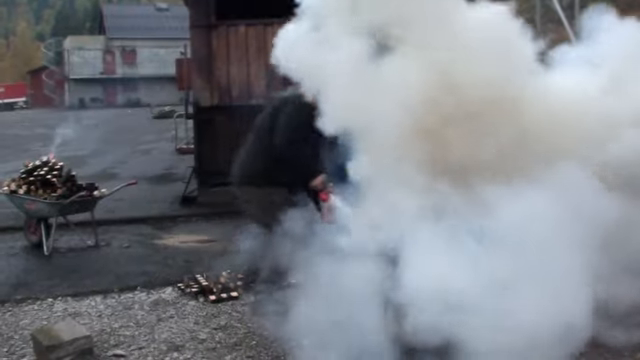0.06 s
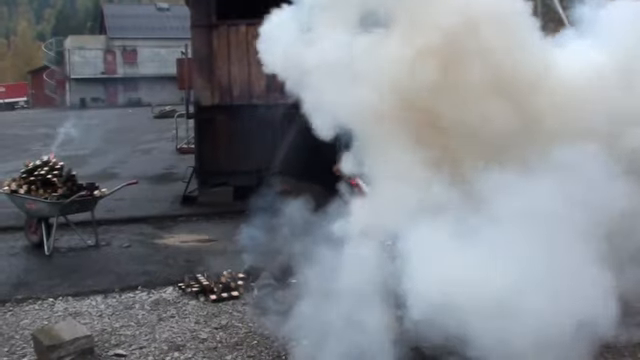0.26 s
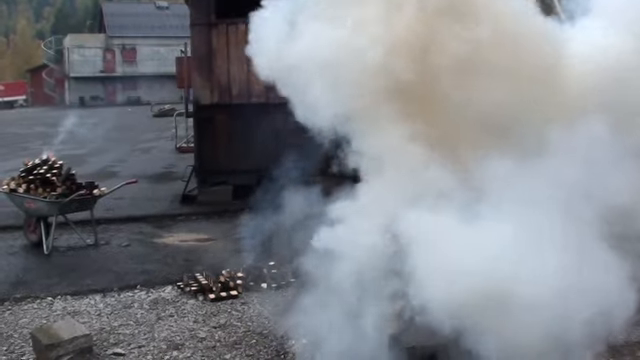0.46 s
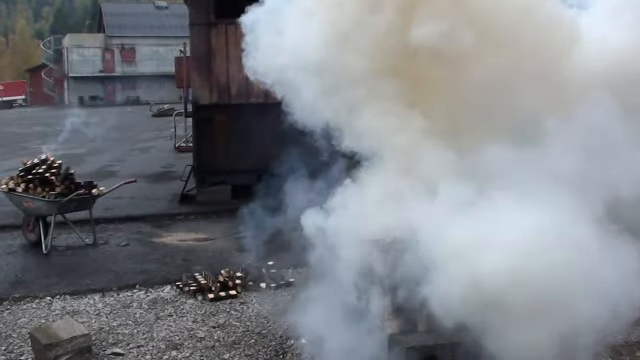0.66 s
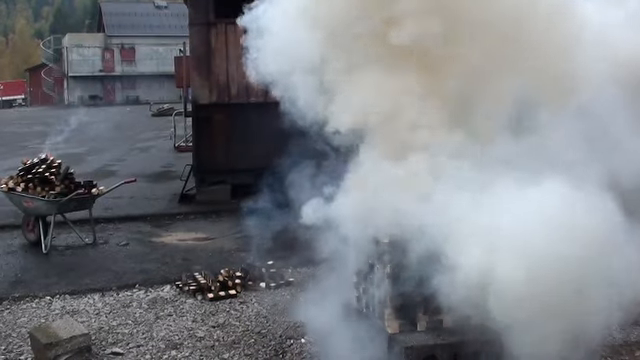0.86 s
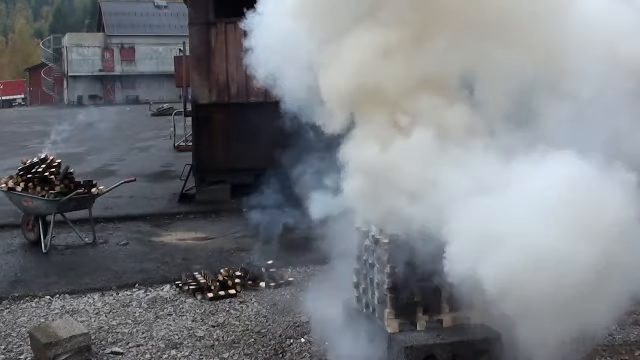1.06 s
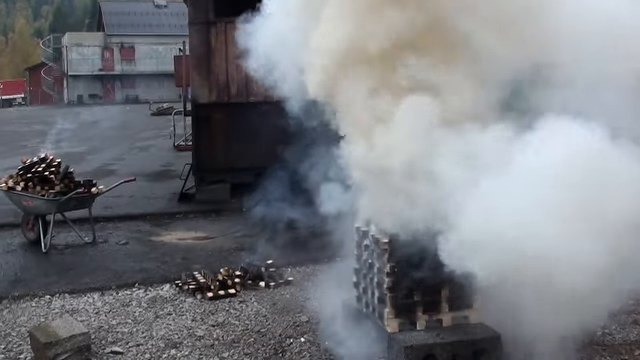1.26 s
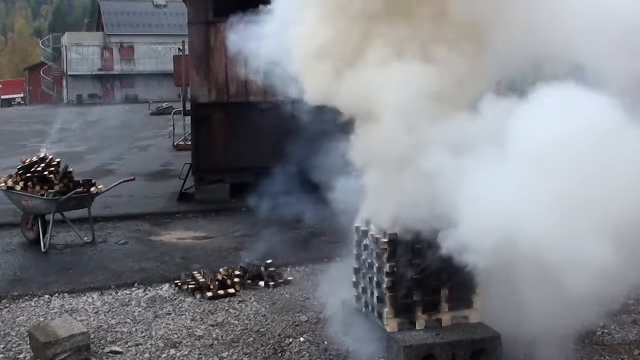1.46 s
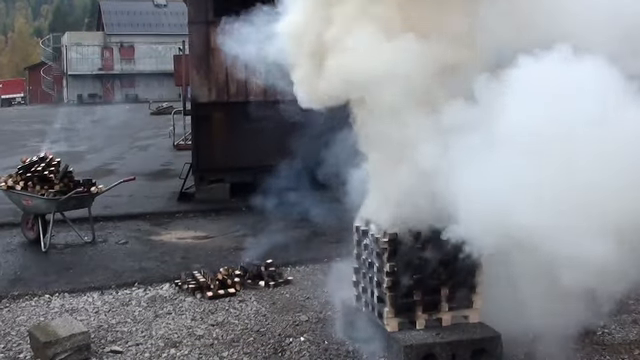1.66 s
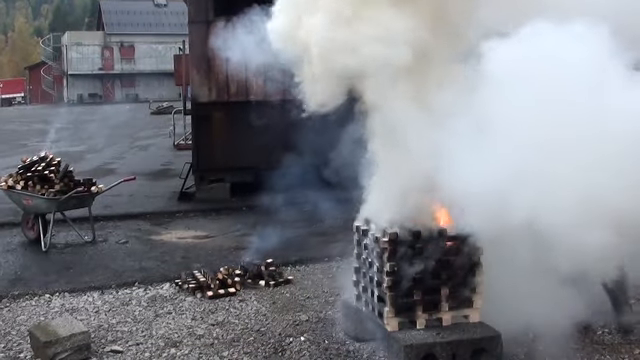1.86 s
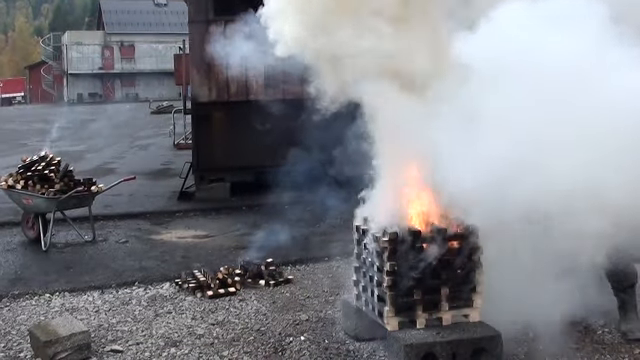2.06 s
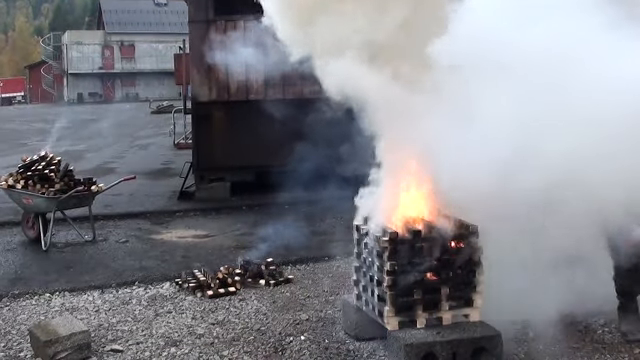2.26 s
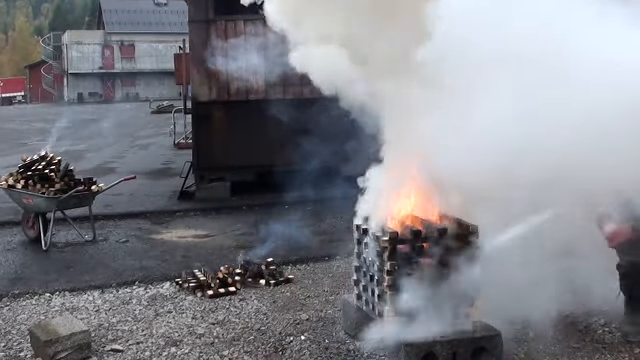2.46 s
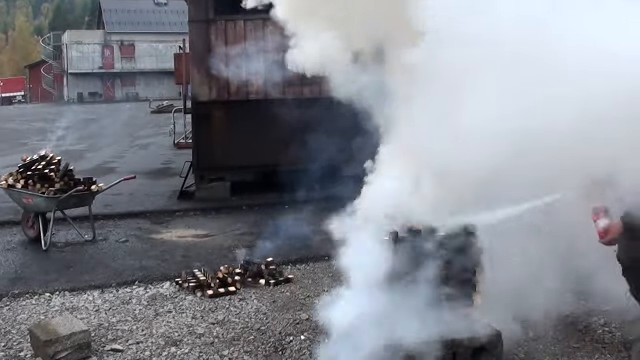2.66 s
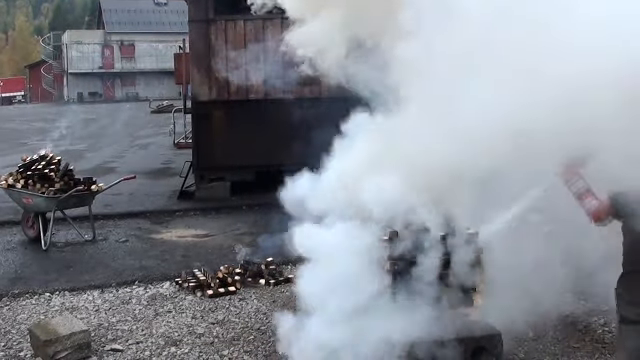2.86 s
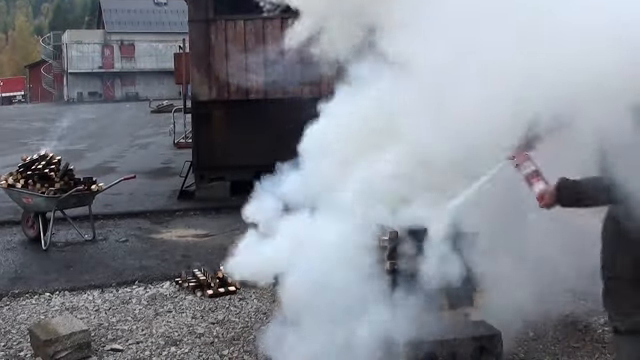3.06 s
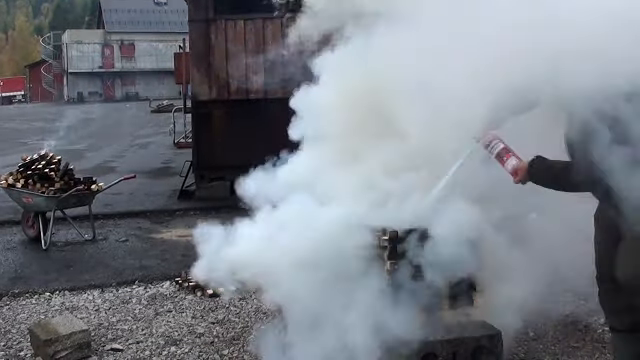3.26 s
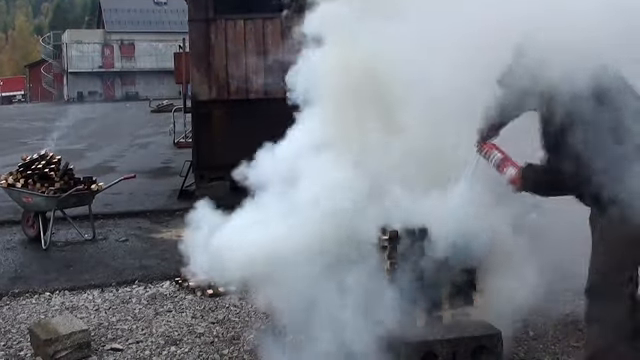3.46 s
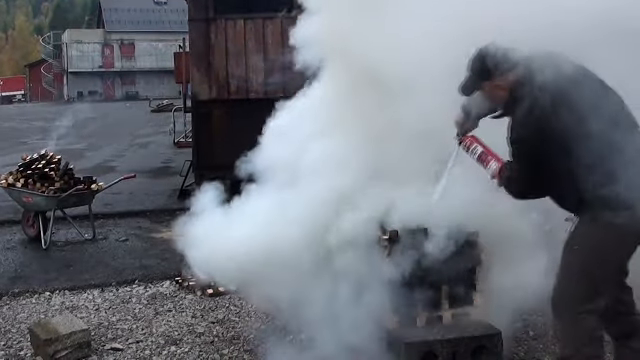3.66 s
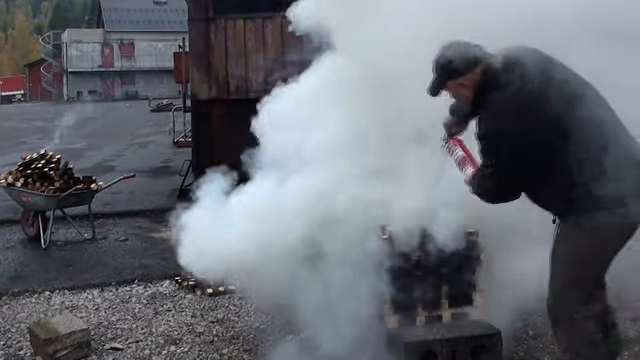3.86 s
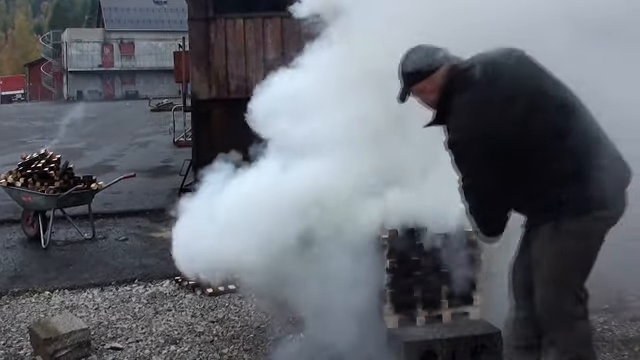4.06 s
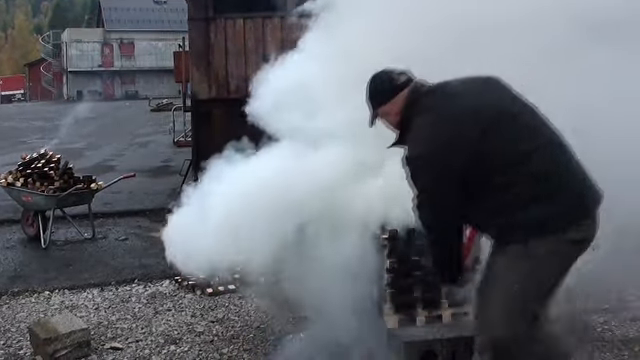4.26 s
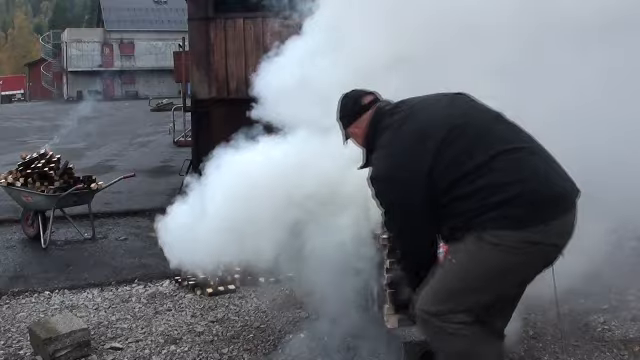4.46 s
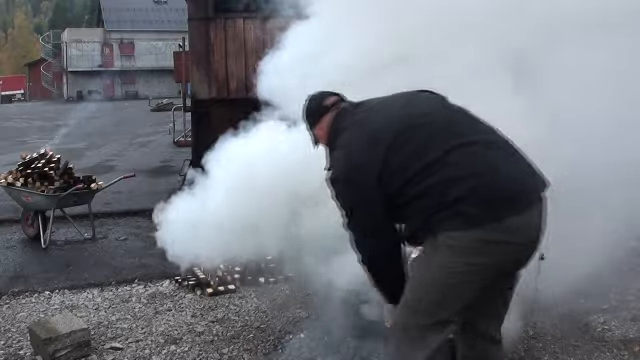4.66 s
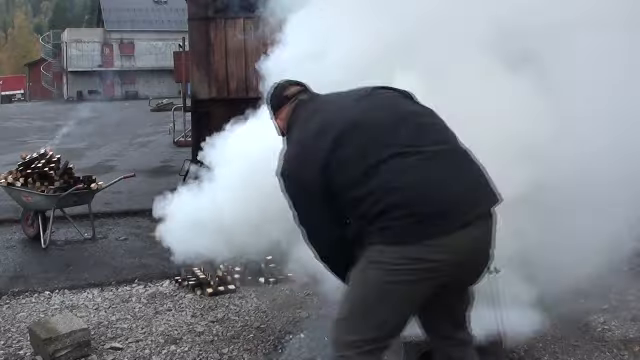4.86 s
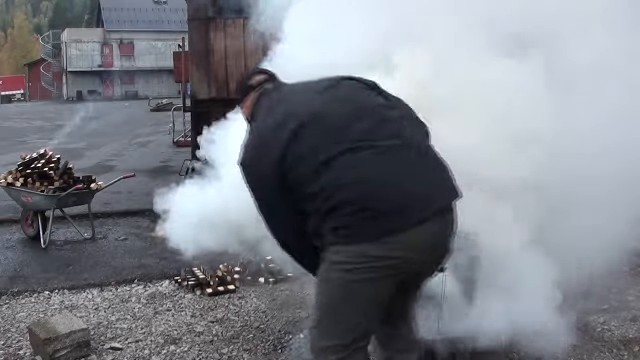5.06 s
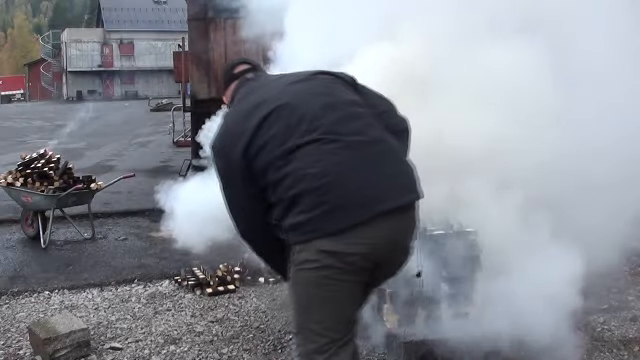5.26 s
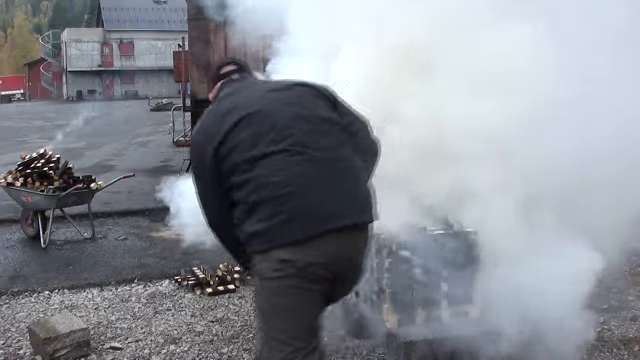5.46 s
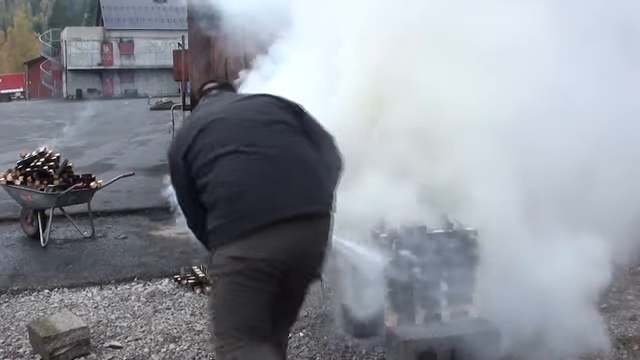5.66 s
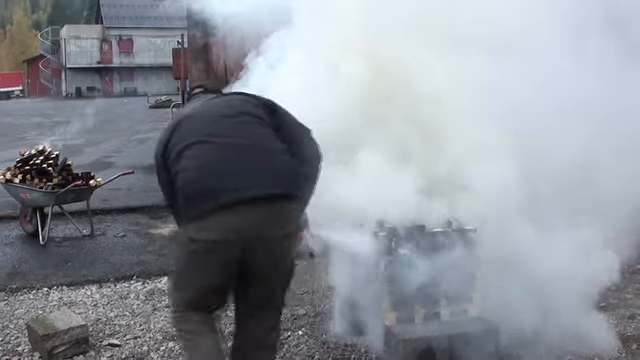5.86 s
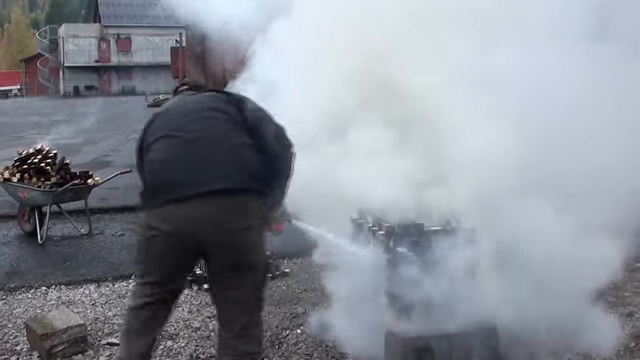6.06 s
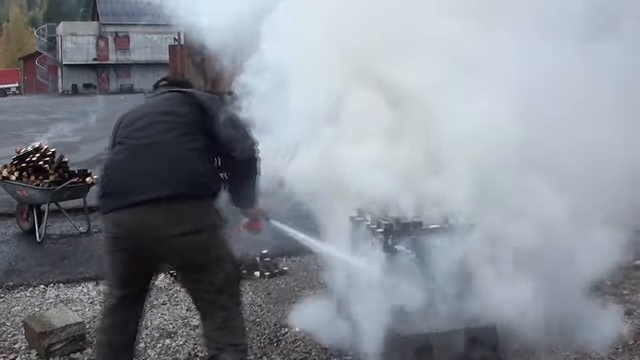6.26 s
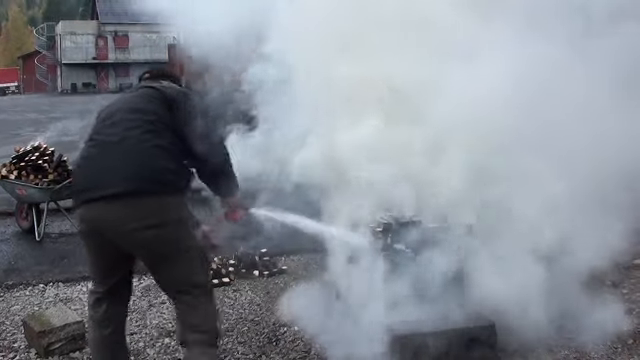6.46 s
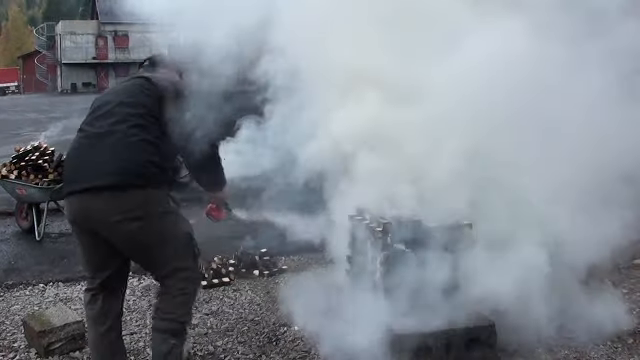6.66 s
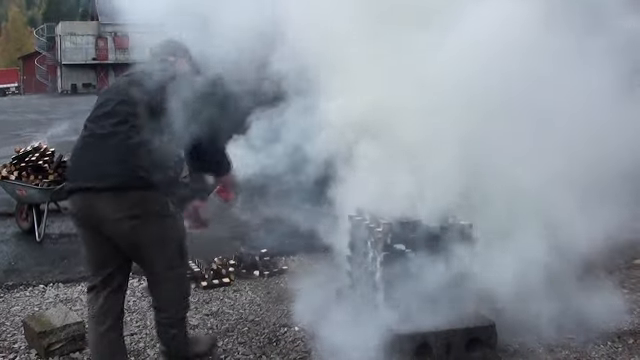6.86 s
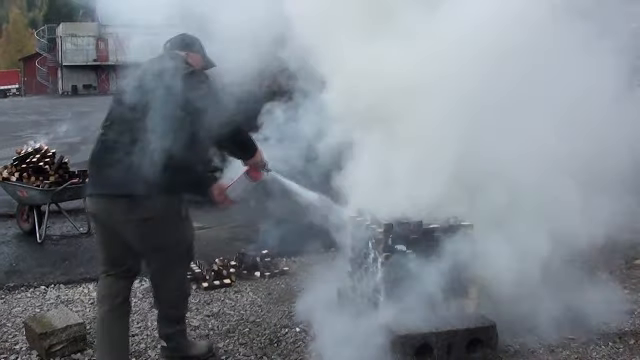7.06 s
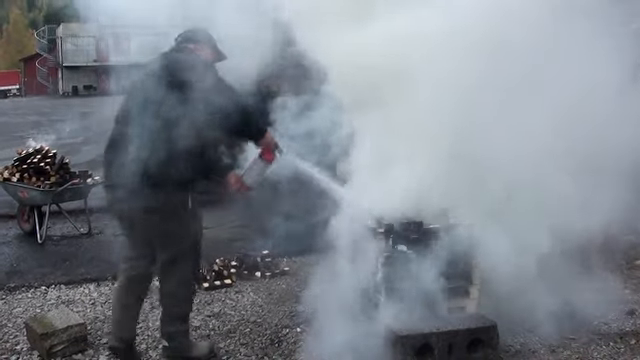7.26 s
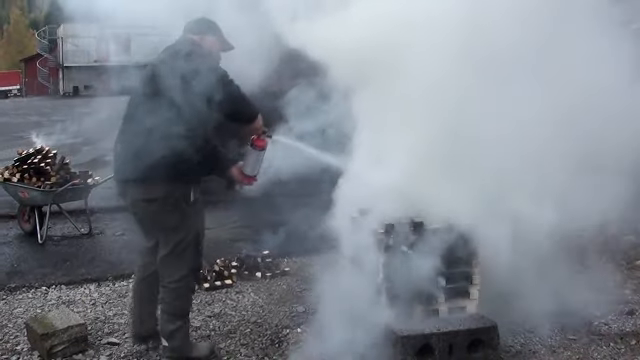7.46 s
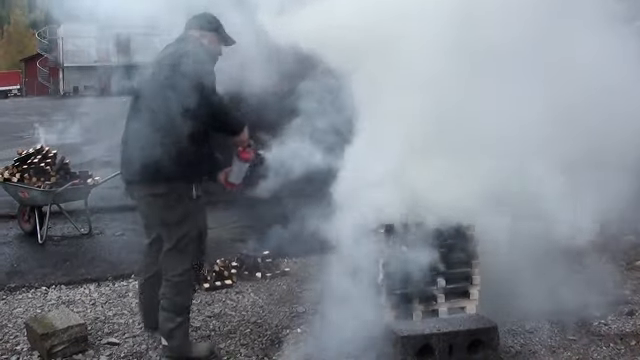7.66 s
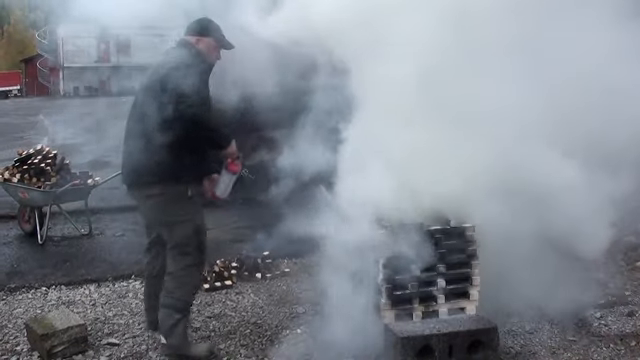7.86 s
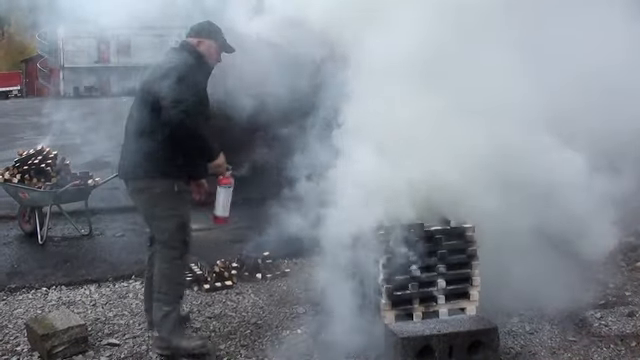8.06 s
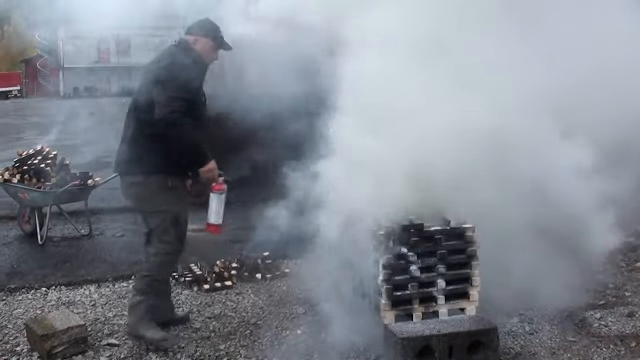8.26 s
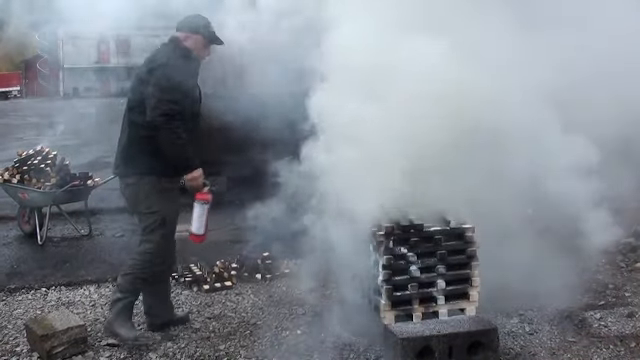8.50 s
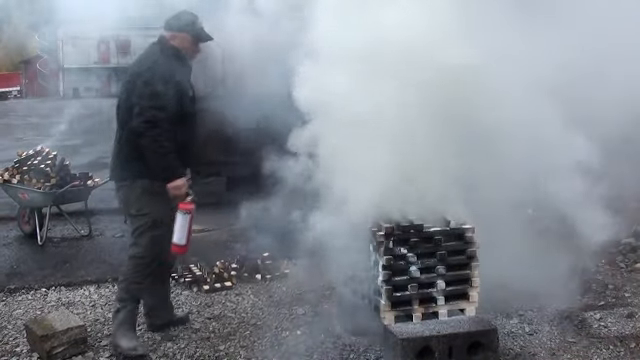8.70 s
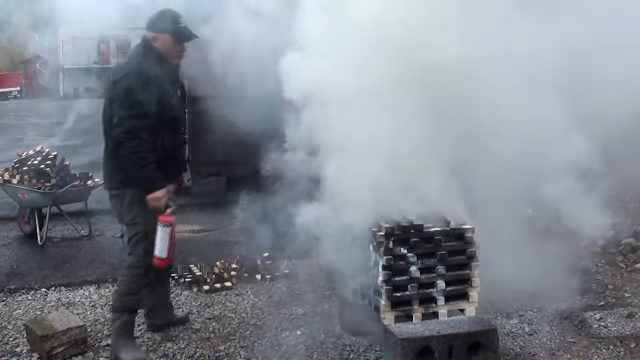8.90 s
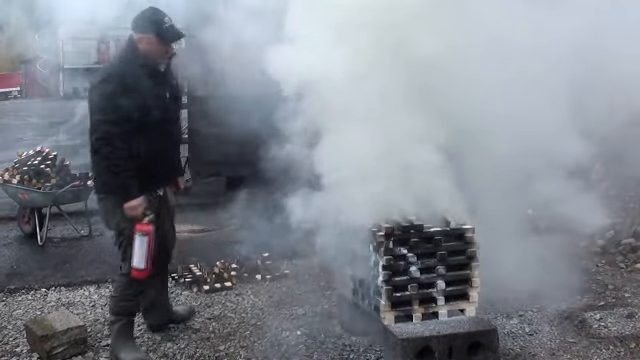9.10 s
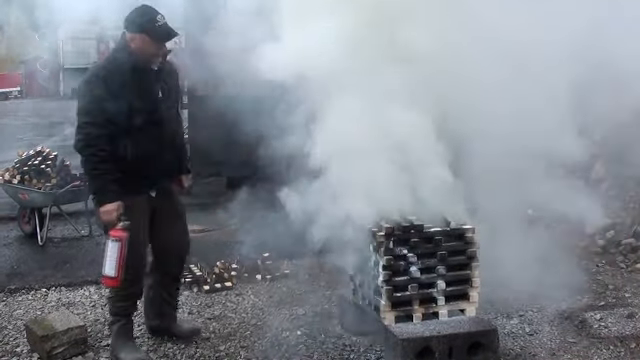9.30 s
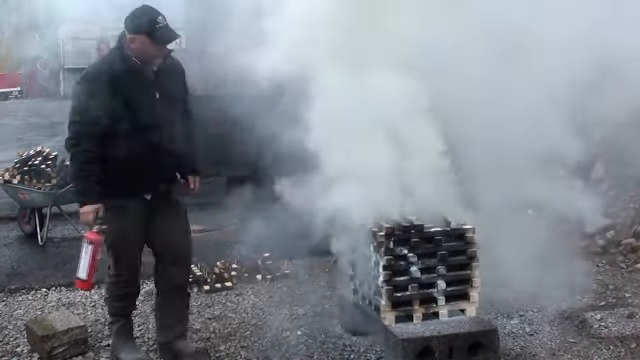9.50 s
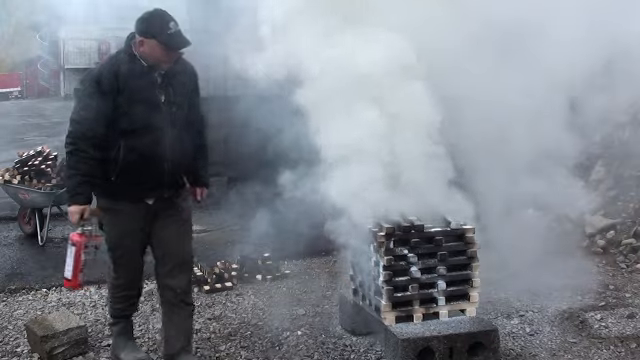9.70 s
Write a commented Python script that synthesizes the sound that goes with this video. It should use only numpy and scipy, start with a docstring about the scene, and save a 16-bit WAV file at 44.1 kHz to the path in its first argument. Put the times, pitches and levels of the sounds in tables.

```python
"""A hand extinguisher sprays five bursts at a burning stack of wood in a gravel yard.
Its jet hisses, spits with each slug (small lump) of liquid and bounces off the ground and the logs.
Steam pockets pop in the wood, and a shed wall slaps each pop back. Wet embers sizzle, boots crunch
on the gravel and a metal part clinks. A far engine hums over a low rumble."""
import sys
import numpy as np
from scipy import signal
from scipy.fft import rfft, irfft, next_fast_len
from scipy.io import wavfile
from scipy.ndimage import uniform_filter1d, map_coordinates

SR = 44100
rng = np.random.default_rng(int(sys.argv[2]) if len(sys.argv) > 2 else 0)


def dump(signal):
    """Clip the signal to [-1, 1] and save it as 16-bit WAV at the path in sys.argv[1]."""
    limited = np.clip(np.atleast_2d(signal).T, -1, 1)
    pcm = np.round(limited * 32767).astype(np.int16)
    wavfile.write(sys.argv[1], SR, pcm)


N = 429093
TIME_S = np.arange(N) / SR
WALL_ECHO_S = .0299

# The valve, one row a burst: opens_s, opening_length_s, shuts_s, closing_length_s
VALVE = [(.035, .007, .53, .042), (2.555, .015, 4.272, .065), (4.595, .02, 5.36, .08),
         (5.765, .045, 6.68, .075), (7.258, .04, 7.545, .07)]
# Tone colour of embers and gravel: pitch_hz, level_db
EMBER_GRAVEL_COLOUR = [(120, -42), (200, -2), (264, -12), (289, -7), (403, -7), (552, -7), (1270, -10.5),
                       (2090, -3.5), (4880, -5.5), (7740, -2.5), (15000, -19), (16500, -34)]
# Short crunches: boots on gravel, and the crunchy tail of the wood pop near 8.82 s:
# middle_s, length_s, grit_db, crunch_db, scuff_db, thud_hz, thud_db
CRUNCHES = [(0.606, 0.073, -71, -61, -52, 480, -57), (1.617, 0.1, -43, -43, -40, 404, -40),
            (1.91, 0.11, -52, -53, -63, 397, -53), (2.113, 0.25, -39, -40, -44, 390, -45),
            (2.276, 0.29, -51, -54, -53, 400, -53), (3.757, .07, -40, -21, -33, 406, -50),
            (4.462, 0.25, -38, -44.5, -40.5, 394, -43), (4.595, 0.098, -27, -36, -45, 400, -55),
            (5.713, 0.065, -29, -19.5, -30, 396, -48), (5.75, 0.099, -33, -32, -35.5, 400, -55),
            (6.87, 0.09, -45, -48, -54, 398, -55), (7.211, 0.12, -39.5, -46, -39.5, 419, -41),
            (8.066, .18, -40, -42, -38.5, 405, -54), (8.18, 0.35, -53, -46.5, -51, 404, -59),
            (8.526, 0.087, -36, -37, -50, 402, -55), (8.835, 0.056, -52, -37, -44, 404, -55),
            (8.873, .13, -50, -52, -45, 393, -57), (9.025, 0.1, -55, -54, -52, 404, -55),
            (9.14, 0.13, -53, -57, -48, 438, -44), (9.22, .15, -45, -46, -53, 400, -55),
            (9.353, .16, -55, -57, -50, 400, -57)]
# Extra noise as a burst ends: sizzle_db, crunch_db, scuff_db
DOUSED_DB = (-37, -34, -46.5)
# How the background rises and falls: time_s, rumble_db, hum_db
BACKGROUND = [(0, -50, -66), (.55, -51, -66), (.9, -58.5, -59), (2.0, -54, -52.5), (2.35, -48.5, -46),
              (2.8, -51.5, -70), (3.7, -51.5, -50), (4.1, -41.5, -54.5), (4.45, -51, -53),
              (5.0, -41.5, -57), (5.4, -50.5, -48), (6.25, -49, -59), (6.85, -52, -50.5), (7.3, -51, -49.5),
              (8.4, -53, -51.5), (9.73, -53.5, -50)]


def jet():
    """Swirling gas hisses and roars; the valve and the moving nozzle shape each burst."""
    # Tone colour of the jet: pitch_hz, level_db
    colour = [(120, -26), (200, -11), (264, -18.5), (368, -10.5), (503, -18), (860, -9.5), (1610, -16.5),
              (2010, -13), (4620, -8), (7060, 1.5), (10400, -9), (14800, -27.5), (15600, -32), (16500, -65)]
    # One row a burst: air_db, wash_db (both against the hiss), low_roar_db, nozzle_ring_db
    # (both against the roar), left_minus_right_db
    bursts = [(-13, -21.5, 1.5, -27, 0.13), (-16.5, -21, -1, -20.5, -0.53), (-17.5, -16.5, -2, -16.5, -1.7),
              (-17.5, -22.5, -4.5, -10, 0.16), (-12.5, -18.5, -2, -18, .2)]
    # The nozzle moves: time_s, hiss_db, roar_db, tone_db (both against the hiss),
    # low_minus_high_hiss_db, ground_delay_ms, ground_strength (0-1)
    nozzle_moves = [(.05, -18.5, -8.5, -24, -5, 1.37, 0.8), (.135, -16.5, -6.5, -25, 7, 1.33, .65),
                    (.2, -19, -9.5, -36, 8, 1.23, 1), (.32, -14.5, -12, -33, -1, 1.24, 0.66),
                    (.39, -15.5, -6, -28, 8, 1.32, 0.7), (.53, -15, -15, -35, -5, 1.26, 0.2),
                    (2.56, -22.5, 3, -21, -5, 1.4, .6), (2.68, -18.5, -2.5, -25, -1, 1.44, 0.8),
                    (2.8, -17.5, -5, -27.5, 0, 1.51, 0.64), (3.25, -16, -5, -26, 3, 1.88, 0.33),
                    (3.6, -16, -8, -47, 0.5, 2.04, 0.48), (4.05, -16, -9.5, -36.5, 2, 2, .05),
                    (4.3, -15.5, -7, -48, -1, 1.9, .27), (4.6, -21.5, -2, -48, -11, 1.6, 0.09),
                    (4.75, -16, -8.5, -48, -2, 1.4, 0), (4.88, -18, -6.5, -48, -2, 1.8, 0.05),
                    (5.0, -19, -9, -48, -7, 1.43, .1), (5.15, -17.5, -9, -48, -1.5, 1.75, 0.14),
                    (5.4, -17, -7.5, -48, 1, 1.8, .13), (5.8, -20, -0.5, -15, -2, 1.78, 0.53),
                    (6.08, -14.5, -11.5, -46, 1, 1.69, 0.32), (6.3, -15.5, -7.5, -40, 3, 1.66, 0.25),
                    (6.5, -15.5, -6, -41, -7, 1.66, 0.44), (6.7, -16, -6.5, -44, -7, 1.68, 0.67),
                    (7.3, -24, 1, -22, -3, 1.8, 0.76), (7.45, -22.5, -2.5, -27, -9, 1.87, 0.5),
                    (7.53, -19.5, 0, -29, -2, 1.92, 0.4)]
    # Slugs, one row a burst: first_per_s, settled_per_s, settling_s, share_of_flow (0-1)
    sputter = [(620, 410, .08, .3), (670, 375, .11, .34), (450, 350, .3, .08), (630, 315, .13, .32),
               (510, 330, .2, .6)]
    row, open_s, shut_s = valve()
    opens, opening, shuts, closing = np.array(VALVE)[row].T
    air_db, wash_db, low_roar_db, ring_db, pan_db = np.array(bursts)[row].T
    first, settled, settling, share = np.array(sputter)[row].T
    hiss_db, roar_db, tone_db, tilt_db, ground_ms, ground_strength = curves(nozzle_moves)
    valve_db = -28 * np.clip(1 - open_s / opening, 0, 1) - 25 * shut_s / closing
    level_db = np.where(open_s > 0, hiss_db + valve_db, -200) + 3
    gush = np.exp(-np.abs(open_s) / .17)  # each burst starts heavier in the bass
    pinch = np.exp(-np.maximum(shuts - opens - open_s, 0) / .093)  # the closing valve brightens it
    # The slugs slow down as the pressure settles.
    slugs_per_s = settled + (first - settled) * np.exp(-np.abs(open_s) / settling) - 20 * open_s
    slug_count = np.cumsum(slugs_per_s) / SR
    flow = near_echoes(spitting_flow(slug_count, share), ground_ms, ground_strength)

    surge_db = wobble(14)
    lean_db = tilt_db / 2 + .27 * wobble(7)
    hiss = .51 * shape(flow, colour, 4650, 6620) * undb(surge_db + lean_db + .8 * wobble(25))
    hiss += .43 * shape(flow, colour, 7030, 10100) * undb(surge_db - lean_db + 3 * wobble(25))
    air = shape(flow, colour, lo_hz=10800) * undb(air_db + 2.5 * pinch + surge_db)
    roar = .73 * shape(flow, colour, 2540, 4720) * undb(surge_db + 2.5 * wobble(25))
    roar += .5 * shape(flow, colour, 1484, 2180) * undb(low_roar_db + surge_db + 1.5 * wobble(25))
    roar += shape(flow, colour, 2880, 3020) * undb(ring_db + 2.4 * wobble(12))  # hollow nozzle ring
    wash = shape(flow, colour, hi_hz=1300) * undb(wash_db + 6.5 * gush + 1.8 * wobble(25))
    tone = sputter_tone(slug_count, gush) * undb(tone_db + 3 * wobble(10))
    # Only hiss and roar are placed left or right; they drift left as a burst dies.
    pan_db = pan_db + 5 * np.minimum(shut_s / closing, 1)
    panned = (hiss + roar * undb(roar_db)) * undb(np.array([pan_db, -pan_db]) / 2)
    return (panned + air + wash + tone) * undb(level_db)


def valve():
    """For each moment: which burst it is, seconds since the valve opened, seconds since it shut."""
    opens, _, shuts, _ = np.transpose(VALVE)
    row = np.maximum(np.searchsorted(opens, TIME_S) - 1, 0)
    return row, TIME_S - opens[row], np.maximum(TIME_S - shuts[row], 0)


def spitting_flow(slug_count, share):
    """Rushing gas, in which each slug of liquid makes a pressure kick and a short puff of noise."""
    timing, strength = rng.standard_normal((N // 60, 2)).T
    number = np.arange(1, int(slug_count[-1]))
    starts = np.interp(number + .07 * timing[number], slug_count, np.arange(N))
    kicks = np.zeros(N)
    kicks[starts.astype(int)] = undb(2.5 * strength[number])
    puffs = signal.lfilter([1], [1, -np.exp(-1 / (.0003 * SR))], kicks)
    spit = .95 * unit(kicks) + .5 * rng.standard_normal(N) * unit(puffs)
    return np.sqrt(1 - share) * rng.standard_normal(N) + np.sqrt(share) * spit


def sputter_tone(slug_count, gush):
    """The slugs come fast enough to make a faint note, buzzier as a burst starts."""
    # Overtones in the opening gush: double_pitch_db, triple_pitch_db
    overtones_db = (-3, -6)
    phase = 2 * np.pi * slug_count + 1.2 * wobble(50)
    buzz = sum(undb(db) * np.sin(k * phase) for k, db in zip((2, 3), overtones_db))
    return np.sin(phase) + gush * buzz


def near_echoes(flow, ground_ms, ground_strength):
    """Ground and wood send the jet back as very short echoes that shift as the hand moves."""
    # The nozzle swings past the stack in the first burst and an upside-down echo closes in:
    # time_s, delay_ms, strength (0-1)
    stack_echo = [(.04, .42, .5), (.15, .29, .8), (.3, .2, .7), (.4, .13, .6), (.55, .092, .4),
                  (.6, .08, .1)]
    stack_ms, stack_strength = curves(stack_echo)
    dull = signal.lfilter(*signal.butter(1, 5000, fs=SR), flow)  # gravel scatters the treble away
    logs = .2 * delayed(flow - dull, .8 + .1 * wobble(8))  # nearby logs return the treble
    ground = ground_strength * delayed(dull, ground_ms + .044 * wobble(30))
    stack = stack_strength * delayed(flow, stack_ms * (1 + .047 * wobble(25)))
    return (flow + logs + ground - stack) / np.sqrt(1 + stack_strength ** 2)


def wood_pops():
    """A steam pocket bursts: the log knocks, snaps and ticks, gas escapes, and the wall echoes."""
    # Pops: start_s, knock_hz, knock_db, snap_db, tick_db, gas_db, echo_db (against snap and tick)
    pops = [(.7372, 900, -60, -45, -22, -33, 5), (0.7586, 900, -58, -31, -27, -21, -25),
            (.8638, 905, -10.5, -15, -14, -14, -3), (.953, 910, -12.5, -10.5, -3.5, -14.5, -1),
            (0.9922, 1630, -29, -20, -11, -58, -6), (1.0445, 880, -16.5, -13.5, -4, -14, -2.5),
            (1.4647, 960, -22.5, -8.5, -8, -20.5, -6), (1.5145, 900, -40, -42, -24, -30, -8),
            (1.7112, 900, -60, -40, -25, -58, -25), (1.758, 940, -27, -18.5, -13.5, -35, 1),
            (1.8635, 1010, -16.5, -3, -10.5, -32, -11.5), (2.04, 1490, -41, -17, -13, -45, -23),
            (2.046, 1410, -19.5, -15, -4.5, -36, -24), (2.1339, 1210, -30, -26, -26, -58, -7),
            (2.1888, 900, -60, -50, -16.5, -58, -19), (2.3514, 730, -35, -34, -25, -58, -9),
            (2.424, 880, -38, -20, -11, -45, -8), (2.4393, 1690, -28, -27, -2, -58, -20),
            (2.45, 1800, -32, -26, -13, -58, 2), (2.894, 860, -15, -1, -11, -50, -11),
            (3.4319, 945, -9.5, -17, -21, -50, -5), (3.641, 1170, -16.5, -2, -12, -50, -2),
            (3.7315, 1780, -9, -19, -19, -50, -6), (3.9364, 1370, -11, -26, -23, -50, -8),
            (4.4003, 930, -25, -29, -13, -9.5, -20), (4.418, 930, -20.5, -30, -10, -58, -20),
            (4.5142, 894, -40, -10.5, -2, -15.5, -35), (4.5526, 1660, -22, -16, 2, -4, -5),
            (4.751, 1030, -11, -34, -25, -50, -3), (4.7617, 990, -10.5, -5.5, -18, -50, 0),
            (4.9317, 843, -12, -2, -20, -50, -2), (4.9629, 714, -13, -3, -18, -50, -1),
            (4.9747, 1100, -8.5, -21, -23, -50, -8), (5.005, 900, -16, -22, -30, -50, -20),
            (5.4999, 890, -44, -25, -20, -60, -25), (5.6094, 510, -36, -25, -14, -28, -3),
            (5.617, 900, -60, -40, -23, -58, -18), (5.6529, 875, -22, -8.5, -6, -18, -6),
            (5.696, 1000, -23, 4, -6.5, -27, -26), (6.398, 900, -17, -20, -30, -50, -20),
            (6.745, 520, -38, -37, -11.5, -17, -1.5), (6.722, 900, -50, -35, -17, -26, -20),
            (6.801, 900, -60, -45, -20, -45, -20), (6.8372, 1270, -23, -12.5, -3.5, -11, -1),
            (6.8456, 900, -60, -33, -12, -58, 5), (6.876, 900, -42, -21, -12, -58, -20),
            (6.961, 900, -49, -29, -17, -23, -27), (7.001, 900, -60, -45, -26, -40, -20),
            (7.081, 900, -60, -47, -20, -34, -13), (7.119, 900, -60, -45, -26, -32, -20),
            (7.135, 1700, -33, -20, -10, -58, -29), (7.171, 894, -45, -26, -20, -31, -24),
            (7.178, 900, -60, -35, -14, -40, -24), (7.193, 910, -49, -23, -28, -29, -25),
            (7.692, 520, -24, -15, -8, -17, -22), (7.9534, 1240, -30, -31, -21, -58, -15),
            (7.9967, 1340, -9, -4.5, -4, -35, -15), (8.063, 890, -15.5, -2, -5, -8, -5.5),
            (8.068, 900, -42, -22, -5, -25, -2), (8.1176, 900, -60, -45, -15, -58, -9),
            (8.1448, 1320, -28, -38, -27, -22, 1), (8.1696, 510, -32, -33, -17, -58, -2),
            (8.297, 900, -60, -42, -16, -27, -25), (8.4635, 900, -60, -54, -19, -58, -5),
            (8.4734, 900, -60, -35, -19, -58, -20), (8.4987, 1090, -17, -12, -3.5, -13, -2),
            (8.8, 900, -60, -47, -23, -45, -11), (8.812, 900, -31, -40, -16, -28, -22),
            (8.818, 1320, -14.5, -3.5, -11, -38, -1.5), (8.857, 925, -17.5, -25, -15, -58, -22),
            (8.9246, 1800, -34, -26, -22.5, -58, -9), (9.03, 900, -60, -27, -18.5, -58, -10),
            (9.175, 940, -24.5, -16.5, -8, -22, -4), (9.2289, 970, -30, -17.5, -14.5, -23, -1),
            (9.3139, 900, -50, -31, -22, -58, 0), (9.335, 1020, -18.5, -7.5, -8, -17, -0.5),
            (9.4777, 1320, -23, -19, -14.5, -22, -8), (9.713, 900, -60, -49, -20, -30, -20)]
    out, size = np.zeros(N + SR), 2048
    ms = np.arange(size) * 1000 / SR
    for start_s, hz, knock_db, snap_db, tick_db, gas_db, echo_db in pops:
        note = np.sin(2 * np.pi * hz * ms / 1000) * np.exp(1 - ms / .64) * ms / .5
        knock = undb(knock_db) * (note + .84 * puff(size, 166, 2800, 1, 4.1))
        for lag_s, knock_gain, crack_gain in ((0, 1, 1), (WALL_ECHO_S, undb(-14.5), undb(echo_db))):
            snap = undb(snap_db) * puff(size, 1790, 4740, .12, 1)
            tick = undb(tick_db) * puff(size, 5520, 8300, .36, 1)
            i = int((start_s + lag_s - .0008) * SR)
            out[i:i + size] += knock_gain * knock + crack_gain * (snap + tick)
        low_gas = undb(knock_db - 7.5) * puff(size, 1060, 3400, 5.2, 14)
        high_gas = undb(gas_db) * puff(size, 5000, 9700, 4.9, 9.9)
        i = int(start_s * SR)
        out[i:i + size] += low_gas + high_gas
    return out[:N]


def metal_clinks():
    """A small metal part of the extinguisher rings, and the wall echoes it."""
    # Each clink: start_s, level_db
    clinks = [(5.5194, -26), (8.1997, -5), (8.4206, -11)]
    # The part's notes: pitch_hz, level_db, ring_s (time to fade by 60 dB)
    notes = [(1370, -16, .1), (2700, -15, 0.15), (4165, -19, .28), (4600, -24, 0.093), (6040, 0, 0.2),
             (6346, 9.5, 0.034), (7300, 4, 0.057), (8230, -9, .12), (8200, -29, .11), (9200, -28, .12),
             (10800, -18, .1), (12230, -15, 0.061), (12800, -15, 0.099)]
    out, t = np.zeros(N), np.arange(SR // 3) / SR
    for start_s, level_db in clinks:
        ring = np.zeros(len(t))
        for hz, note_db, ring_s in notes:
            fade = undb(note_db + 2 * rng.standard_normal()) * 1000 ** (-t / ring_s)
            ring += fade * np.sin(2 * np.pi * (hz * t + rng.random()))
        ring = ring * (1 - np.exp(-t / .00053)) / abs(ring).max()
        ring[:2048] += .78 * puff(2048, 4900, 10300, .61, 3.3)
        for lag_s, echo_db in ((0, 0), (WALL_ECHO_S, -10)):
            i = int((start_s + lag_s) * SR)
            out[i:i + len(t)] += undb(level_db + echo_db) * ring
    return out


def embers(fine_clicks):
    """Wet embers sizzle with tiny clicks over a hiss; the same sound adds grit to each crunch."""
    # Embers flare up: middle_s, length_s, level_db
    flares = [(0, 0.13, -41), (.78, .12, -47), (1, 0.11, -42), (1.5, 0.098, -50), (1.77, 0.28, -52),
              (2.17, 0.24, -37), (2.48, 0.24, -37), (4.44, 0.22, -37.5), (5.47, 0.1, -41), (5.59, .1, -49),
              (6.87, 0.19, -40), (7.03, .16, -51), (7.25, .16, -44), (7.82, 0.24, -43.5), (7.98, .16, -50),
              (8.18, 0.28, -43), (8.38, 0.3, -35), (8.63, 0.12, -47), (9.02, 0.14, -44), (9.17, 0.21, -44),
              (9.37, 0.11, -51)]
    middle_s, length_s, grit_db = np.transpose(CRUNCHES)[:3]
    sizzle = shape(rng.standard_normal(N) + fine_clicks, EMBER_GRAVEL_COLOUR, lo_hz=5200)
    flaring = undb(-46.5) + swells(*np.transpose(flares))
    return sizzle * (flaring + swells(middle_s, length_s, grit_db) + doused(DOUSED_DB[0]))


def doused(level_db):
    """A jump in level that dies quickly each time the valve shuts."""
    _, _, shut_s = valve()
    return undb(level_db) * (shut_s > 0) * np.exp(-shut_s / .07)


def crunches(fine_clicks):
    """Gravel shifts under boots and the ground gives a hollow thud; one wood pop ends in a crunch too."""
    middle_s, length_s, _, crunch_db, scuff_db, _, _ = np.transpose(CRUNCHES)
    stones = grains(per_s=400, spread_db=2.2) * undb(3 * wobble(25))
    gravel = rng.standard_normal(N) + .18 * fine_clicks + .39 * stones
    crunch = shape(gravel, EMBER_GRAVEL_COLOUR, 1580, 5140)
    crunch *= undb(-52) + swells(middle_s, length_s, crunch_db) + doused(DOUSED_DB[1])
    scuff = shape(rng.standard_normal(N) + .72 * stones, EMBER_GRAVEL_COLOUR, 253, 1334)
    scuff *= undb(.9 * wobble(15))
    scuff *= undb(-45.5) + swells(middle_s, length_s, scuff_db) + doused(DOUSED_DB[2])
    thuds = np.zeros(N)
    for middle, length, *_, thud_hz, thud_db in CRUNCHES:
        note = np.sqrt(2) * np.sin(2 * np.pi * thud_hz * TIME_S + 1.2 * wobble(40))
        thuds += note * swells([middle - .01], [.6 * length], [thud_db])
    return crunch + scuff + thuds


def engine():
    """A far engine hums on one low, wavering note."""
    _, hum_db = curves(BACKGROUND)
    pitch_hz = 72 + 2.62 * wobble(6.6)
    return np.sin(2 * np.pi * np.cumsum(pitch_hz) / SR) * undb(hum_db + 1.5 + 2 * wobble(8))


def rumble():
    """Deep noise that swells and sinks."""
    # Tone colour of the rumble: pitch_hz, level_db
    colour = [(12, -44), (20, -12), (48, -11.5), (70, -2), (183, -1.5), (254, -8.5), (320, -3), (420, -34),
              (700, -120)]
    rumble_db, _ = curves(BACKGROUND)
    return shape(rng.standard_normal(N), colour, hi_hz=260) * undb(rumble_db + 4 + 2.2 * wobble(8))


def yard_scatter(mono):
    """Sound scattered around the yard reaches left and right unequally."""
    # How much of the sound differs between the sides: pitch_hz, level_db
    side_colour = [(60, -36), (150, -26), (350, -19.5), (700, -20), (1400, -26), (2800, -22), (5600, -19),
                   (9000, -23), (12000, -46)]
    echoes = rng.standard_normal(1024) * np.exp(-np.arange(1024) / (.011 * SR))
    echoes /= np.linalg.norm(echoes)
    size = next_fast_len(N + 1024)
    _, gain = colour_gain(side_colour, size)
    side = irfft(rfft(mono, size) * rfft(echoes, size) * gain, size)[:N]
    return np.array([side, -side])


def undb(db):
    """Turn decibels into a gain."""
    return 10 ** (np.asarray(db) / 20)


def unit(x):
    """Scale to an average (rms) level of 1."""
    return x / np.sqrt(np.mean(x ** 2))


def colour_gain(colour, size):
    """The frequencies of a spectrum, and a tone colour's gain at each."""
    freq_hz = np.arange(size // 2 + 1) * SR / size + 1
    hz, db = np.transpose(colour)
    return freq_hz, undb(np.interp(np.log(freq_hz), np.log(hz), db))


def shape(x, colour, lo_hz=0, hi_hz=SR):
    """Give x a tone colour inside a soft-edged band, at an average level of 1."""
    size = next_fast_len(N)
    hz, gain = colour_gain(colour, size)
    gain /= np.sqrt((1 + (lo_hz / hz) ** 12) * (1 + (hz / hi_hz) ** 12))
    return unit(irfft(rfft(x, size) * gain, size)[:N])


def curves(table):
    """Join timed rows with straight lines, one curve a column."""
    times, *columns = np.transpose(table)
    return [np.interp(TIME_S, times, column) for column in columns]


def swells(middles_s, lengths_s, levels_db):
    """A level curve with one rounded hump for each event."""
    return sum(undb(db) * np.cos(np.pi * np.clip((TIME_S - middle) / length, -.5, .5)) ** 2
               for middle, length, db in zip(middles_s, lengths_s, levels_db))


def wobble(per_s):
    """A smooth random curve of size about 1, with per_s new values a second."""
    hold = int(SR / per_s)
    stairs = np.repeat(rng.standard_normal(N // hold + 1), hold)
    return unit(uniform_filter1d(uniform_filter1d(stairs, hold), hold)[:N])


def delayed(x, ms):
    """x after a moving delay."""
    return map_coordinates(x, [np.arange(N) - ms * SR / 1000], order=3)


def grains(per_s, spread_db):
    """Clicks at random moments, a few of them large."""
    chance, sign, strength = rng.random((N, 3)).T
    level_db = spread_db * np.minimum(-np.log(1 - strength), 5)
    return unit((chance < per_s / SR) * np.sign(sign - .5) * undb(level_db))


def puff(size, lo_hz, hi_hz, rise_ms, fall_ms):
    """A short band of noise with a peak of about 1."""
    ms = np.arange(size) * 1000 / SR
    noise = rng.standard_normal(size) * (1 - np.exp(-ms / rise_ms)) * np.exp(-ms / fall_ms)
    noise = signal.sosfilt(signal.butter(2, [lo_hz, hi_hz], "band", fs=SR, output="sos"), noise)
    return noise / abs(signal.hilbert(noise)).max()


def scene():
    """All sources sit near the middle, and the yard widens them."""
    stereo = jet() + wood_pops() + metal_clinks()
    fine_clicks = grains(per_s=600, spread_db=3.2) * undb(3.5 * wobble(25))
    stereo += embers(fine_clicks) + crunches(fine_clicks) + rumble() + engine()
    return stereo + yard_scatter(stereo.mean(axis=0))


def record(dry):
    """Gain control turns loud parts down, peaks are rounded, the deepest bass and top treble are cut."""
    power = signal.lfilter([1 / (.037 * SR)], [1, 1 / (.038 * SR) - 1], np.mean(dry ** 2, axis=0))
    excess_db = np.maximum(10 * np.log10(power + 1e-9) + 25, 0)
    turned_down = dry * undb(-.25 * excess_db)
    rounded = np.tanh(1.4 * turned_down) / 1.4
    bass_cut = signal.lfilter(*signal.butter(2, 35, "high", fs=SR), rounded)
    return signal.sosfilt(signal.ellip(8, .2, 70, 15900, fs=SR, output="sos"), bass_cut)


dry = scene()
out = record(dry)
dump(out)
```